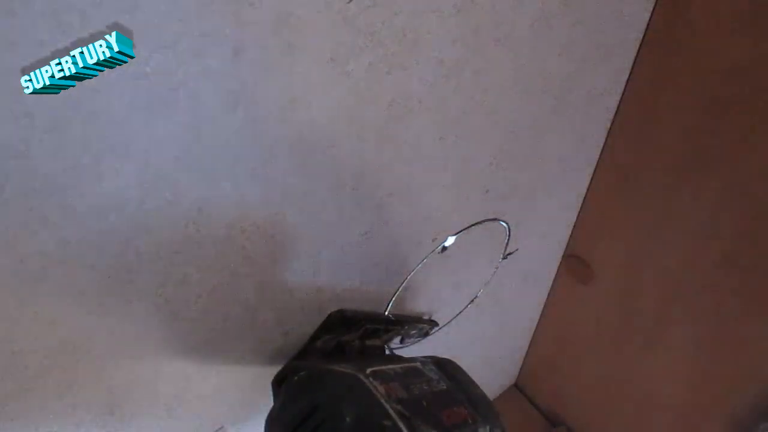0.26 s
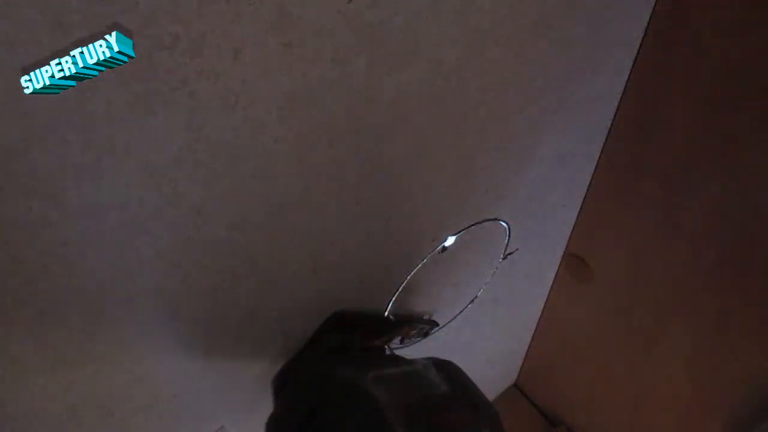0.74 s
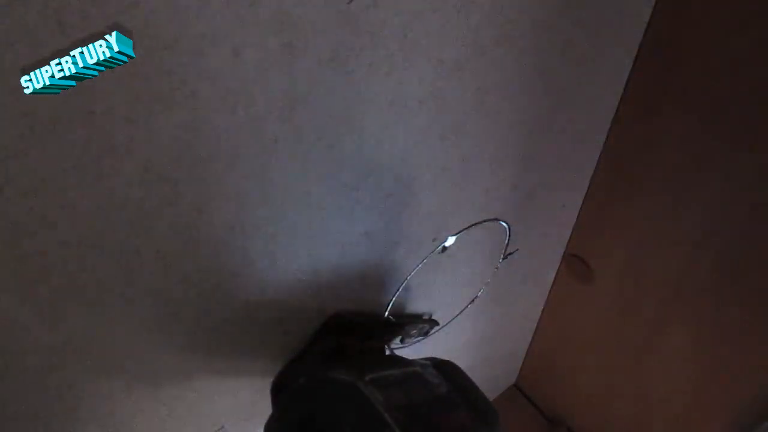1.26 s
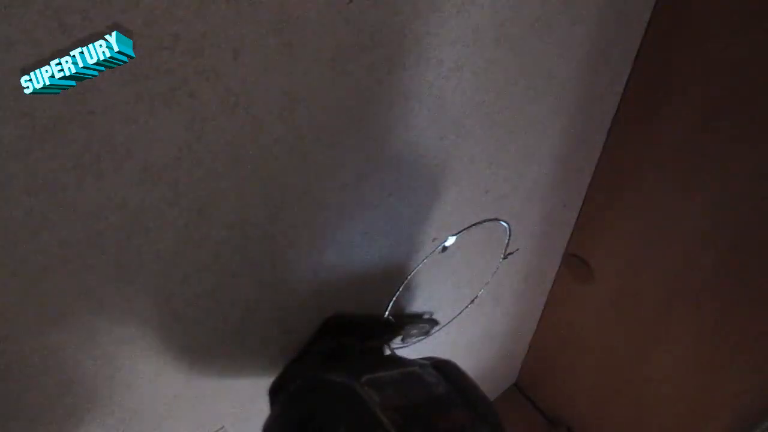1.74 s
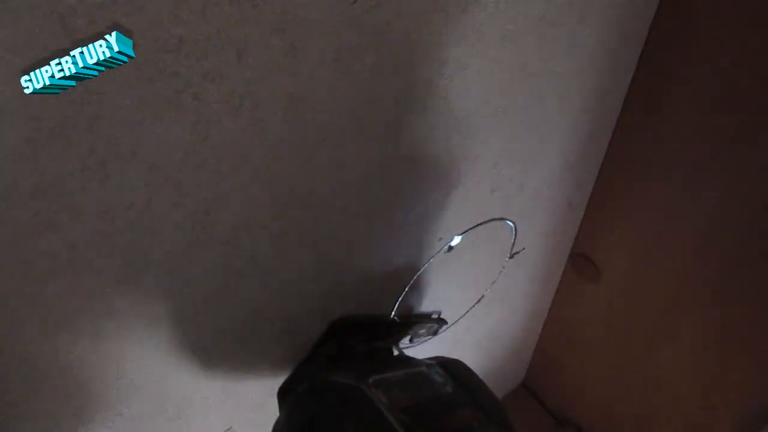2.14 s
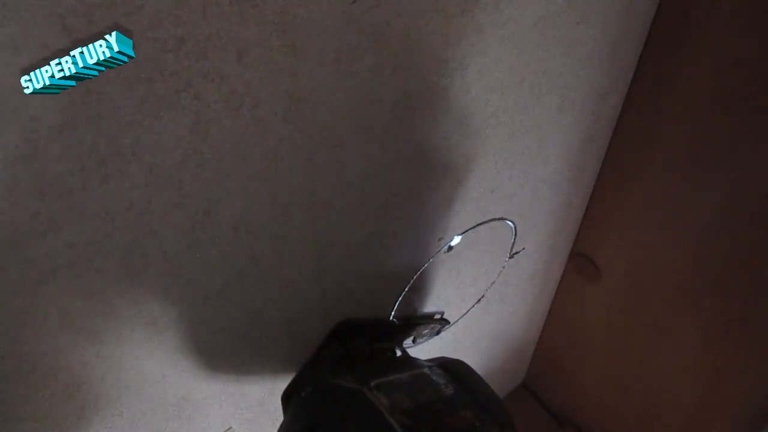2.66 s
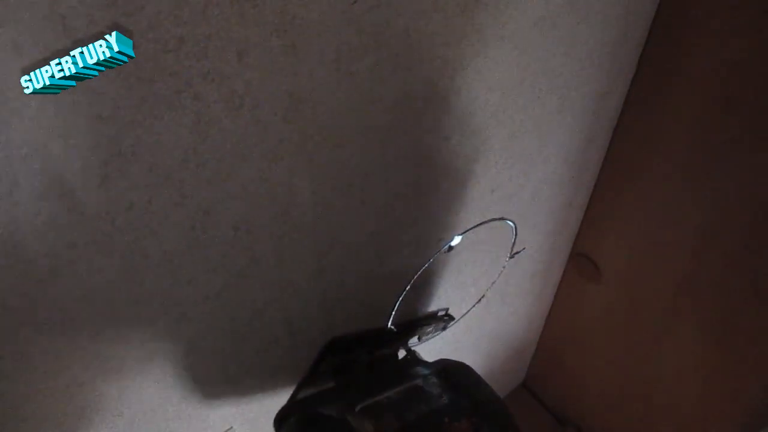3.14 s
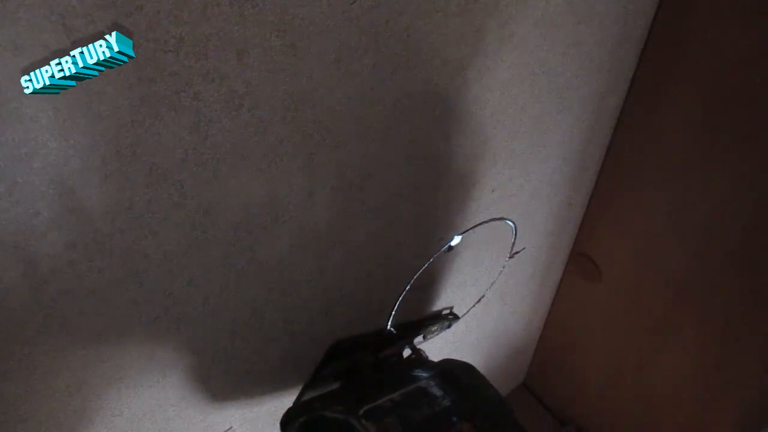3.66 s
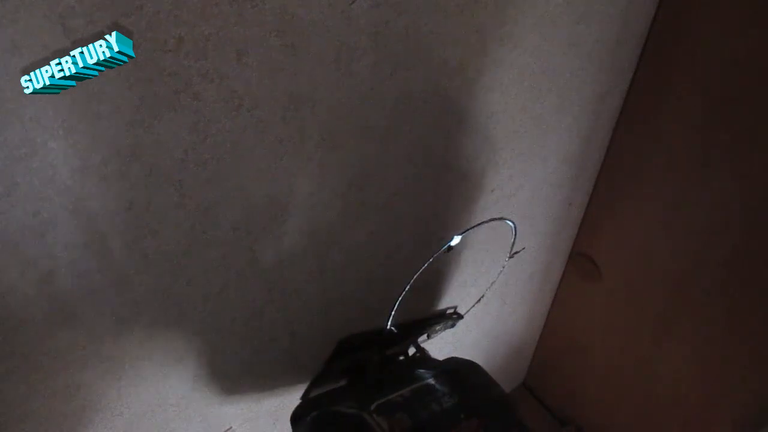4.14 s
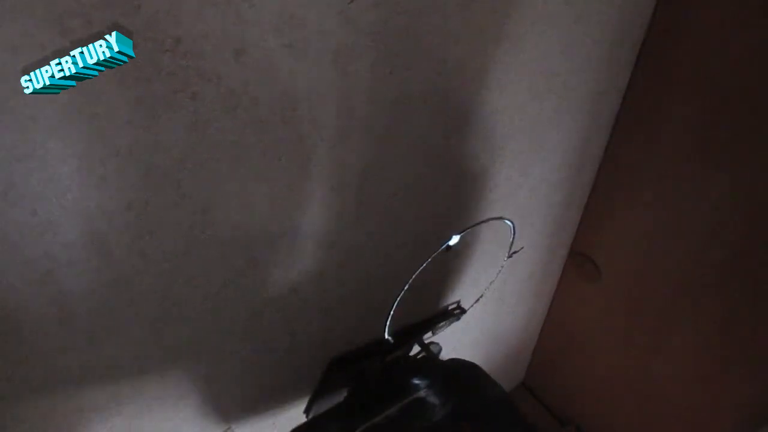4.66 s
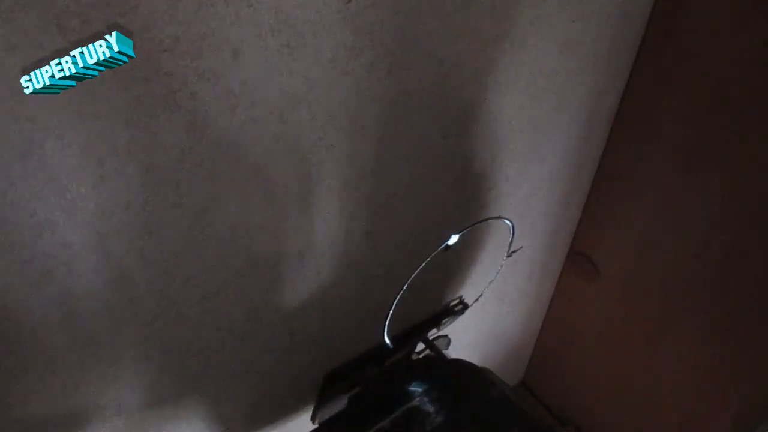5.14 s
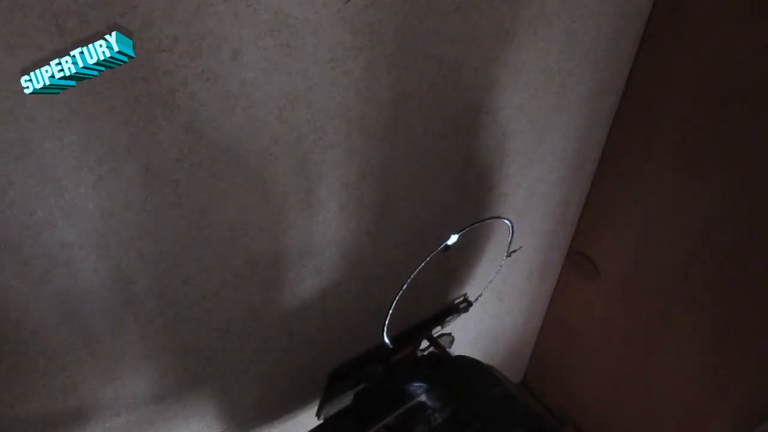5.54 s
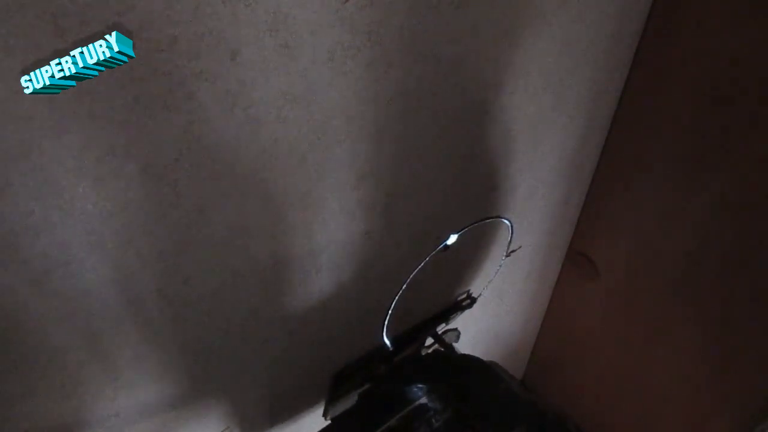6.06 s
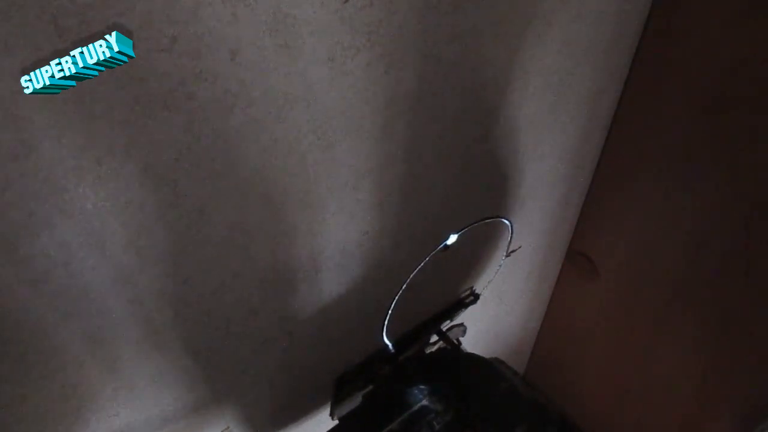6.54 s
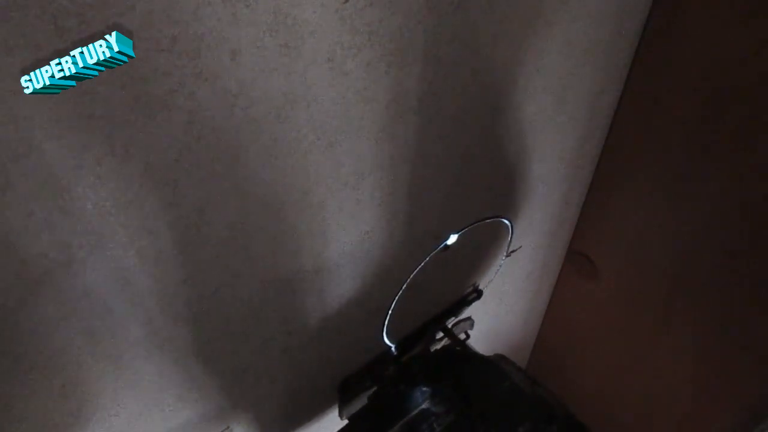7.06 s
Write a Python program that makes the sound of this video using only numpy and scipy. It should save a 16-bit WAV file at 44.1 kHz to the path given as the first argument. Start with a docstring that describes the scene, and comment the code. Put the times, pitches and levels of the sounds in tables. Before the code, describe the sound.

Quiet handling bumps on a panel give way to a power drill spinning up into a loud, rasping, squealing, continuous cut, heard very close.

```python
"""A hand-held drill jerks on against a thin panel, spins up and cuts steadily: forced vibration at
multiples of the shaft rate drums in the panel, and noise repeated on every turn makes rasp, growl and squeal.
Beforehand the panel booms and knocks under the hands, as short low tones and resonant noise; cloth rustles
as coloured noise. Loud low thumps mark the start. The very close microphone squeezes the treble at each
large swing."""
import sys
import numpy as np
from scipy import signal
from scipy.fft import rfft, irfft, next_fast_len
from scipy.io import wavfile
from scipy.ndimage import uniform_filter1d, map_coordinates

SR = 44100
rng = np.random.default_rng(int(sys.argv[2]) if len(sys.argv) > 2 else 0)


def log_audio(samples):
    """Write samples as a 16-bit WAV file to the path given in sys.argv[1]."""
    # one column per channel
    frames = np.atleast_2d(samples).T
    # limit to full scale, then quantise
    limited = np.clip(frames, -1, 1)
    pcm = np.round(limited * 32767).astype(np.int16)
    wavfile.write(sys.argv[1], SR, pcm)


N = 321930

# Shaft speed, spin-up then a run with a sag: time_s, speed_turns_per_s
SHAFT_SPEED = [(1.75, 28.4), (1.8, 29.8), (1.85, 31.8), (1.9, 34.8), (2.05, 39.1), (2.2, 42), (2.39, 44.9),
               (2.62, 46.3), (2.8, 46.8), (3.2, 46.4), (3.54, 46.6), (3.85, 47.1), (4.5, 47.05),
               (4.68, 46.9), (4.8, 46.1), (5.19, 46.05), (5.45, 46.6), (5.81, 47.2), (6.58, 47.1),
               (6.7, 46.9), (7.3, 47)]
FULL_SPEED, SPIN_UP = 47, 19  # turns per s at full speed, and gained while spinning up
# Last stretch through the panel: time_s, depth_share (0-1)
CUT_DEPTH = [(5.2, 0.18), (5.6, .25), (6.3, 0.61), (7.0, 0.78), (7.3, 0.94)]
# How freely the panel swings round the cut; drumming moves from 7th order to 5th: time_s, loose_share (0-1)
PANEL_LOOSENESS = [(2.2, 0.12), (2.8, 0.18), (3.54, 0.13), (3.76, 0.53), (4.5, 0.66), (4.75, 0.35),
                   (5.2, 0.48), (5.45, 0.62), (5.81, 0.79), (6.58, 0.87), (7.3, 0.94)]
# Orders that drum in the panel: order_multiple, full_speed_db,
# then added: start_speed_db, loose_panel_db, full_depth_db
DRUM_ORDERS = [(1, -35, -18, 0, -16), (2, -23, -2, 4, -10.5), (3, -17.5, 6.5, 1.5, -5),
               (4, -42, 11, 10.5, -1), (5, -21, -11, 10, 0.9), (6, -23.5, 0, 7, -18.5),
               (7, -14.5, -9, -16, -5), (8, -40, 11, -3.5, -0.5), (9, -41.5, 19, -30, -10),
               (10, -34.5, -2, 5.5, -15.5), (11, -35.5, -12, -3.8, 3.5), (13, -43.5, 10, 8, 3.5)]
# Weaker upper shaft orders: order_multiple, level_db (as at 50.5 turns per s)
UPPER_ORDERS = [(12, -44), (14, -40.5), (15, -36), (16, -43.5), (18, -49), (22, -40), (27, -38.5),
                (30, -41.5), (39, -36.5), (43, -36.5), (45, -35), (47, -45), (49, -40)]
DRIFT_DB, HIGH_DRIFT_DB = 0.8, 2.2  # slow wander of the drumming orders up to the 7th, and above
# The tool jerks on: time_s, rasp_db, growl_db
JERK_LEVELS = [(1.6, -53, -59), (1.63, -41, -33), (1.66, -49, -27), (1.68, -29, -35), (1.71, -28.5, -21.5),
               (1.735, -21, -27), (1.77, -42, -29)]
# Rasp of the teeth in the cut: time_s, level_db (before a 0.1 dB lift)
CUT_RASP = [(1.77, -36), (1.87, -30), (2.1, -29), (2.27, -27), (2.41, -21.5), (2.46, -23), (2.6, -26),
            (2.66, -23.5), (2.77, -22.5), (3.0, -25.5), (3.3, -25.5), (3.39, -22.5), (3.55, -24.5),
            (3.7, -23), (4.0, -23), (4.22, -23.5), (4.55, -25), (4.8, -26.5), (5.31, -23.5), (5.7, -22.5),
            (5.81, -25), (5.87, -22), (6.2, -25.5), (6.3, -23), (6.46, -25), (6.6, -24), (6.8, -24.5),
            (7.0, -24.5), (7.1, -26), (7.3, -25.5)]
# Rasp colour: frequency_hz, relative_density_db (per Hz)
RASP_SPECTRUM = [(900, -10), (1600, -3.5), (2400, -1), (3110, -1.5), (3970, -2), (5910, -2), (8000, -6.5),
                 (10200, -12.5), (13000, -23.5), (15500, -32)]
# Growl colour: frequency_hz, relative_density_db (per Hz)
GROWL_SPECTRUM = [(25, -29), (60, -3), (140, 0), (300, 2.5), (490, 0), (700, -1), (900, -3.5), (1500, -3.5),
                  (2200, -10.5), (3500, -13)]
GROWL_DB, GROWL_FOLLOWS = -23.5, 0.27  # growl at median rasp; dB of growl per dB of rasp
# Singing bands of the saw: shallow_hz, shallow_width_hz, deep_hz, deep_width_hz, added_level_db
SINGING_BANDS = [(2073, 120, 2220, 360, 1), (4096, 500, 3900, 670, -3), (5880, 430, 5700, 450, -3)]
# Lowest singing band, before spin-up and band offsets: time_s, level_db
LOW_SING_LEVEL = [(2.1, -36), (2.42, -20), (2.46, -28), (2.59, -19.5), (2.66, -34), (2.78, -22),
                  (2.94, -30), (3.31, -30), (3.39, -22), (4.04, -24), (4.13, -37), (4.18, -27), (4.56, -33),
                  (4.82, -24.5), (4.98, -30), (5.01, -25), (5.39, -23.5), (5.44, -18.5), (5.49, -34),
                  (5.53, -20), (6.2, -34.5), (6.26, -29), (7.14, -26), (7.3, -33)]
# Two upper singing bands, before spin-up, rasp and band offsets: time_s, middle_db, top_db
UPPER_SING_LEVELS = [(2.1, -38, -36), (2.3, -22, -40), (2.42, -27, -32), (2.6, -28, -30.5), (3.2, -31, -34),
                     (3.4, -29.5, -32.5), (4.1, -36, -31.5), (4.5, -36, -31), (4.8, -26, -31.5),
                     (5.5, -27, -31), (6.2, -27.5, -29), (6.5, -35, -32), (7.3, -35, -27.5)]
SING_FOLLOWS, SING_WANDER_DB = 1.4, 1  # the upper bands: dB per dB of rasp, own wander
# Thumps of the panel, quiet ones under the hands, then loud ones as the tool jerks on:
# centre_s, level_db (before a 2.5 dB lift), pitch_hz, length_s
THUMPS = [(0.036, -27, 76, 0.0047), (0.085, -25, 101, 0.0078), (0.312, -30, 68, 0.019),
          (0.482, -39, 75, 0.018), (0.611, -27, 96, 0.0049), (0.638, -27, 93, 0.0038),
          (0.824, -26, 88, 0.0092), (0.903, -20, 75, 0.013), (1.009, -20, 80, 0.007),
          (1.096, -15, 75, 0.014), (1.181, -33, 87, 0.009), (1.265, -32, 110, 0.006), (1.37, -31, 93, 0.01),
          (1.43, -32, 111, 0.0091), (1.547, -32, 77, 0.0086), (1.62, -3, 100, 0.0036),
          (1.641, -5, 99, 0.015), (1.674, -4, 104, 0.0017), (1.719, -11, 85.6, 0.025),
          (1.74, -8.5, 87, 0.0044)]
# Tool tip on the panel: time_s, level_db (before a 3.5 dB cut), rise_s
TIP_KNOCKS = [(1.014, -21.5, 0.0062), (1.073, -23.5, 0.011), (1.18, -25.5, 0.0094), (1.233, -25.5, 0.0046),
              (1.341, -36, 0.0062), (1.42, -30.5, 0.0084), (1.5, -35, 0.006), (1.544, -36, 0.0091),
              (1.566, -31, 0.0047), (1.612, -29, 0.011), (1.631, -13, 0.0055), (1.676, -9.5, 0.0085),
              (1.71, -9.5, 0.014)]
# Panel resonances: pitch_hz, width_hz, level_db
PANEL_MODES = [(297, 52, 4), (615, 127, -1.5), (1070, 136, -8), (1430, 190, -13.5), (2430, 1050, -26.5)]
# Boom under the hands: time_s, level_db
BOOM_LEVEL = [(0, -51), (0.07, -36.5), (0.6, -33), (0.92, -32), (1.11, -29), (1.19, -39), (1.57, -41),
              (1.62, -11.5)]
# Boom colour: frequency_hz, relative_density_db (per Hz)
BOOM_SPECTRUM = [(15, -35), (35, -7), (72, -2), (115, -9.5), (190, -25), (300, -60)]
# Sleeve strokes: peak_s, rustle_db, murmur_db, rise_s, fall_s
SLEEVE_STROKES = [(0.072, -55, -38, .04, 0.019), (0.3, -61, -65, 0.02, 0.061),
                  (0.446, -53, -50, 0.044, 0.038), (0.585, -35, -40, 0.022, 0.026),
                  (0.916, -48.5, -43, 0.092, 0.11), (1.186, -53, -46, .03, 0.024),
                  (1.248, -53.5, -32, 0.013, 0.018), (1.352, -56, -50, 0.03, 0.023),
                  (1.425, -57, -34.5, 0.0047, 0.014), (1.57, -53.5, -41, .012, .05)]
STILL_RUSTLE_DB, STILL_MURMUR_DB = -65, -48.5  # floor between strokes
# Murmur colour: frequency_hz, relative_density_db (per Hz)
MURMUR_SPECTRUM = [(150, -1), (300, 2), (600, -9), (1200, -12.5), (1800, -21), (2500, -45)]
# Rustle colour: frequency_hz, relative_density_db (per Hz)
RUSTLE_SPECTRUM = [(900, -40), (2100, 3.5), (3500, -2), (5000, -2.5), (8000, -8.5), (12000, -21),
                   (15500, -38)]
# Treble of brisk strokes: frequency_hz, relative_density_db (per Hz)
FIZZ_SPECTRUM = [(4000, -19), (7000, -6), (9000, -2), (12000, -11), (15500, -20)]
TOP_HZ = 15650  # upper band limit of the output


def drill():
    """Forced vibration: one shaft angle drives both the panel's drumming and the noise of the teeth."""
    (speed,), (depth,) = curves(SHAFT_SPEED), curves(CUT_DEPTH)
    slow = (FULL_SPEED - speed) / SPIN_UP
    turn = 2 * np.pi * np.cumsum(speed) / SR
    unsteady = 1 + 0.22 * (47.5 - speed)  # while speeding up the saw skips, so turns are less alike
    (rasp_db,) = curves(CUT_RASP)
    rasp_rise_db = rasp_db - np.median(rasp_db)
    cut = during(CUT_RASP, fade=.02)
    rasp, growl = rasp_and_growl(turn, unsteady, rasp_db, rasp_rise_db, cut)
    squeal = saw_squeal(turn, unsteady, slow, depth, rasp_rise_db)
    # At low speed the treble drops out in gaps, in step with the third order.
    gap = np.sin(order_angle(turn, 3) - .6) ** 2 * (.65 + .35 * np.sin(turn))
    gap_gain = amp(-3.6 * np.maximum(39 - speed, 0) * gap * during(SHAFT_SPEED))
    drum = np.sqrt(2) * panel_drum(speed, turn, slow, depth) * during(SHAFT_SPEED)
    return drum + (rasp + squeal * cut) * gap_gain + growl * gap_gain ** 0.5


def order_angle(turn, k):
    """Harmonic phase: the k-th multiple of the turn, with the panel delaying higher orders more."""
    return k * turn - .63 * k * k


def panel_drum(speed, turn, slow, depth):
    """Order excitation: sinusoids locked to multiples of the shaft rate, weighted by the panel's state."""
    (loose,) = curves(PANEL_LOOSENESS)
    drum = 0
    for k, full_db, start_db, loose_db, deep_db in DRUM_ORDERS:
        level_db = full_db + start_db * slow + loose_db * loose + deep_db * depth
        if k == 3:
            third_db = level_db
        drift_db = (DRIFT_DB if k < 8 else HIGH_DRIFT_DB) * wobble(5)
        drum += amp(level_db + drift_db) * np.sin(order_angle(turn, k))
    for k, db in UPPER_ORDERS:
        level_db = db + 1.7 * wobble(2.56) + 1.0 * (speed - 50.5)
        drum += amp(level_db) * np.sin(order_angle(turn, k) + 1.3 * wobble(6))
    # At low speed the overloaded sound turns spiky: odd overtones of the third order.
    spikes = amp(third_db - 14 - 0.84 * (speed - 32.5) + 3 * wobble(40))
    spike_angle = order_angle(turn, 3) + 0.3 * wobble(50)  # the spiky overtones waver in phase
    return drum + spikes * (.5 * np.sin(5 * spike_angle + 2.8) - np.sin(3 * spike_angle + 1.4))


def rasp_and_growl(turn, unsteady, rasp_db, rasp_rise_db, cut):
    """Cyclic roughness noise: treble rasp and lower growl share a pattern rate set by the shaft."""
    jerk_rasp_db, jerk_growl_db = curves(JERK_LEVELS)
    jerk = during(JERK_LEVELS, fade=0.0045)
    chips = amp(2.1 * wobble(900) + 0.69 * wobble(25))
    rasp = coloured(kerf(turn, renew=4.5, fresh=0.83 * unsteady), RASP_SPECTRUM)
    rasp += 0.83 * noise(RASP_SPECTRUM, patchy_db=1.5)
    rasp_gain = amp(rasp_db + 0.1) * cut + amp(jerk_rasp_db) * jerk
    rasp = rasp_gain * unit(rasp * bite(turn, 1.0, 1.2) * chips)
    growl = coloured(kerf(turn, renew=3.5, fresh=0.48 * unsteady), GROWL_SPECTRUM)
    growl += 0.55 * noise(GROWL_SPECTRUM, patchy_db=1.9)
    growl_db = GROWL_DB + GROWL_FOLLOWS * rasp_rise_db + 1.0 * wobble(9)
    growl_gain = amp(growl_db) * cut + amp(jerk_growl_db) * jerk
    return rasp, growl_gain * unit(growl * bite(turn, 1.0, .8))


def saw_squeal(turn, unsteady, slow, depth, rasp_rise_db):
    """Resonance: tooth noise excites three saw bands, each crossfading to its deep form with depth."""
    deep = np.clip((depth - 0.25) / 0.28, 0, 1)
    (low_db,) = curves(LOW_SING_LEVEL)
    sing_db = [low_db - 12 * slow]
    for db in curves(UPPER_SING_LEVELS):
        sing_db.append(db - 30 * slow + SING_FOLLOWS * rasp_rise_db + SING_WANDER_DB * wobble(8))
    squeal = 0
    for (shallow_hz, shallow_width, deep_hz, deep_width, db), level_db in zip(SINGING_BANDS, sing_db):
        teeth = kerf(turn, renew=4.5, fresh=0.35 * unsteady)
        shallow_band = resonant_band(teeth, shallow_hz, shallow_width)
        deep_band = resonant_band(teeth, deep_hz, deep_width)
        sing = (1 - deep) * shallow_band + deep * deep_band
        squeal += amp(level_db + db) * unit(sing * bite(turn, 2.0, 3.0) * amp(0.87 * wobble(15)))
    return squeal


def resonant_band(x, hz, width):
    """Cascaded resonance: the same mode applied twice, scaled to rms 1."""
    return unit(filtered(x, lambda f: modes([(hz, width, 0)])(f) ** 2))


def bite(turn, once_db, twice_db):
    """Amplitude modulation: an off-centre saw bites unevenly, once and twice a turn."""
    return amp(once_db * np.sin(turn) + twice_db * np.sin(2 * turn + 2.07))


def kerf(turn, renew, fresh, size=900):
    """Cyclic excitation: roughness met every turn, worn anew renew times a second, plus a fresh share."""
    rough = rng.standard_normal((int(N / SR * renew) + 4, size))
    wear = np.arange(N) / SR * renew
    place = turn / (2 * np.pi) % 1 * size
    again = map_coordinates(rough, [wear, place], order=1, mode="grid-wrap")
    even = again / np.hypot(wear % 1, 1 - wear % 1)  # undo the level loss of blending two shapes
    return unit(even) + fresh * rng.standard_normal(N)


def panel_and_hands():
    """Superposition: panel thumps and tip knocks add to the boom and cloth noise of handling."""
    handling = (handling_bed() + sleeve_rustle()) * during(BOOM_LEVEL, fade=0.2)
    return panel_thumps() + tip_knocks() + handling


def panel_thumps():
    """Impulsive bending: each thump swings the whole panel as a low tone in a bell-shaped envelope."""
    t = np.arange(N) / SR
    thumps = 0
    for s, db, hz, length in THUMPS:
        envelope = np.exp(-.5 * ((t - s) / length) ** 2)
        thumps += amp(db + 2.5) * envelope * np.sin(2 * np.pi * (hz * (t - s) + rng.random()))
    return thumps


def tip_knocks():
    """Modal excitation: brief rattling contact of the tool tip sounds the panel's resonances."""
    t = np.arange(N) / SR
    chatter = 0
    for s, db, rise in TIP_KNOCKS:
        age = np.maximum(t - s + 0.0035, 0) / rise
        chatter += amp(db) * age * np.exp(1 - age)
    rattle = rng.standard_normal(N) * amp(1.1 * wobble(330))
    return amp(-3.5) * chatter * unit(filtered(rattle, modes(PANEL_MODES)))


def handling_bed():
    """Low-frequency radiation: boom noise of the held panel, and a murmur that swells with each stroke."""
    boom_db, = curves(BOOM_LEVEL)
    murmur = stroke_gain(2, STILL_MURMUR_DB) * noise(MURMUR_SPECTRUM, patchy_db=1)
    return amp(boom_db) * noise(BOOM_SPECTRUM, patchy_db=2) + murmur


def sleeve_rustle():
    """Friction noise: cloth strokes give treble that grows faster than their level."""
    brisk = stroke_gain(1, STILL_RUSTLE_DB)
    rustle = brisk * unit(noise(RUSTLE_SPECTRUM, patchy_db=3.0) * amp(1.5 * wobble(360)))
    return rustle + amp(19.0) * brisk ** 1.604 * noise(FIZZ_SPECTRUM, patchy_db=5.5)


def stroke_gain(column, still_db):
    """Envelope superposition: uneven bell shapes, one per sleeve stroke, over a still floor."""
    t = np.arange(N) / SR
    gain = amp(still_db)
    for row in SLEEVE_STROKES:
        s, rise, fall = row[0], row[3], row[4]
        gain = gain + amp(row[column]) * np.exp(-.5 * ((t - s) / np.where(t < s, rise, fall)) ** 2)
    return gain


def noise(spectrum, patchy_db):
    """Random excitation: coloured noise of rms 1 with time-frequency patches of random gain."""
    z = signal.stft(rng.standard_normal(N), nperseg=512)[2]
    field = uniform_filter1d(uniform_filter1d(rng.standard_normal(z.shape), 6, 0), 14, 1)
    patchy = signal.istft(z * amp(patchy_db * unit(field)), nperseg=512)[1][:N]
    return coloured(patchy, spectrum)


def coloured(x, spectrum):
    """Spectral shaping: x weighted by a (Hz, dB) curve on a log-frequency axis, rms 1."""
    f, db = np.transpose(spectrum)
    return unit(filtered(x, lambda hz: amp(np.interp(np.log(hz + 1), np.log(f), db, -120, -120))))


def modes(table):
    """Modal summation: the response of a body with (Hz, width, dB) resonances of alternating sign."""
    def response(f):
        return sum((-1) ** k * amp(db) * 1j * f * w / (c * c - f * f + 1j * f * w)
                   for k, (c, w, db) in enumerate(table))
    return response


def filtered(x, response):
    """Linear filtering: x times a complex response of frequency, padded against wrap-round."""
    m = next_fast_len(N + SR // 2)
    return irfft(rfft(x, m) * response(np.fft.rfftfreq(m, 1 / SR)), m)[..., :N]


def wobble(rate):
    """Band-limited fluctuation: a smooth random curve, rate knots a second."""
    return map_coordinates(rng.standard_normal(int(N * rate / SR) + 4), [np.arange(N) * rate / SR])


def curves(rows):
    """Linear interpolation: one value per sample for each column after the time."""
    s, *cols = np.transpose(rows)
    return [np.interp(np.arange(N) / SR, s, c) for c in cols]


def during(rows, fade=0.036):
    """Gating: 1 inside the time span of a table, fading to 0 outside over fade seconds."""
    first, last = rows[0][0], rows[-1][0]
    return np.interp(np.arange(N) / SR, [first - fade, first, last, last + fade], [0, 1, 1, 0])


def amp(db):
    """Logarithmic level: decibels to gain."""
    return 10 ** (np.asarray(db) / 20)


def unit(x):
    """Power normalisation: x scaled to rms 1."""
    return x / np.sqrt(np.mean(x ** 2) + 1e-20)


def scene():
    """Superposition: the running tool, the thumps and the handling add at one microphone."""
    return (drill() + panel_and_hands())[None]


def record(dry):
    """Overload: large low swings leave the microphone less room for treble; the converter clips softly."""
    low = filtered(dry, lambda hz: 1 / (1 + (hz / 520) ** 6))
    # The swing ahead of the bass cut: deep tones are larger and later.
    swing = filtered(low, lambda hz: (1 + 75 / (45 + 1j * hz)) ** 2)
    # Overdrive sets in once the sound has been loud for a moment (mean of the last 0.14 s).
    loud = uniform_filter1d(np.minimum(np.abs(low), .1), 6001, origin=3000)
    settled = np.clip(loud / .095, 0, 1) ** 12
    room = 1 / (1 + np.abs(settled * (swing - .05) / 0.44) ** 6.0)
    wet = low + amp(1.5) * room * (dry - low)
    wet = wet / (1 + np.abs(wet) ** 12) ** (1 / 12)
    return filtered(wet, lambda hz: hz < TOP_HZ)


dry = scene()
out = record(dry)
log_audio(out)
```